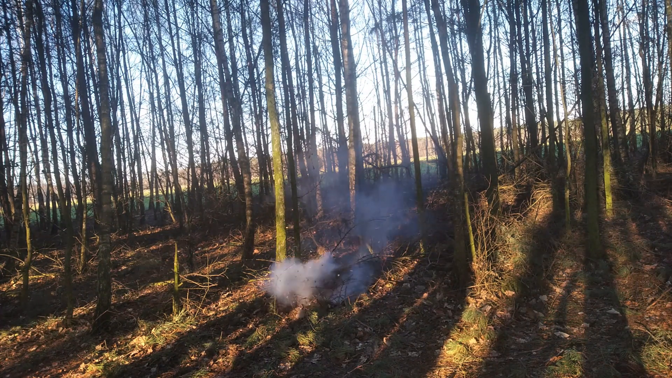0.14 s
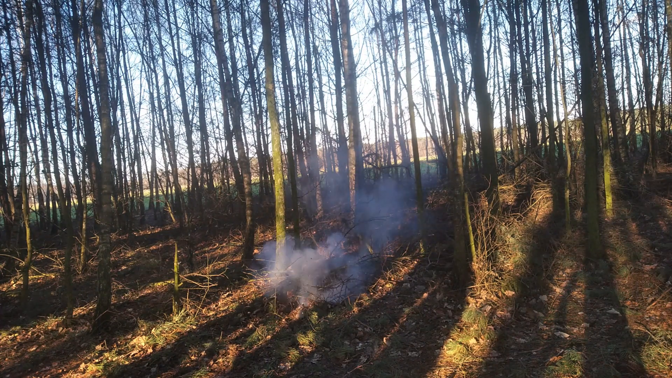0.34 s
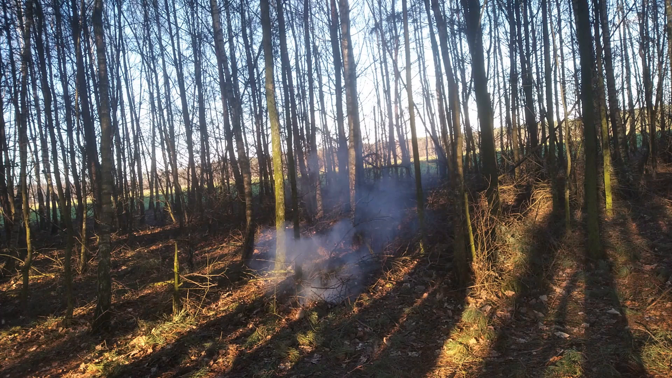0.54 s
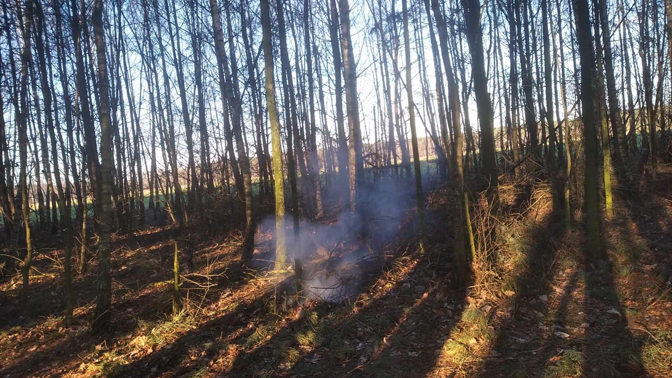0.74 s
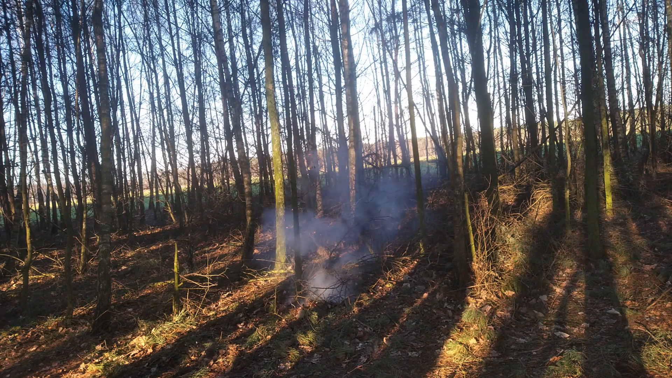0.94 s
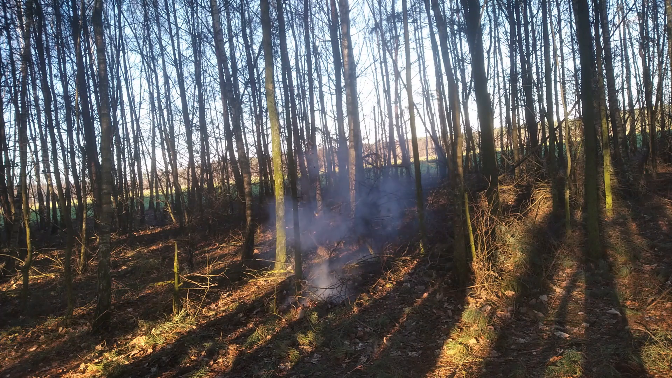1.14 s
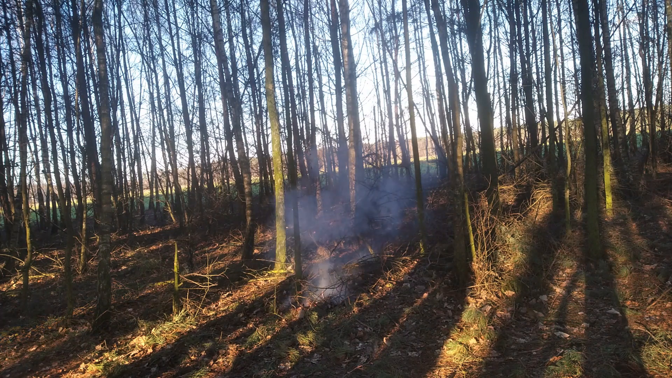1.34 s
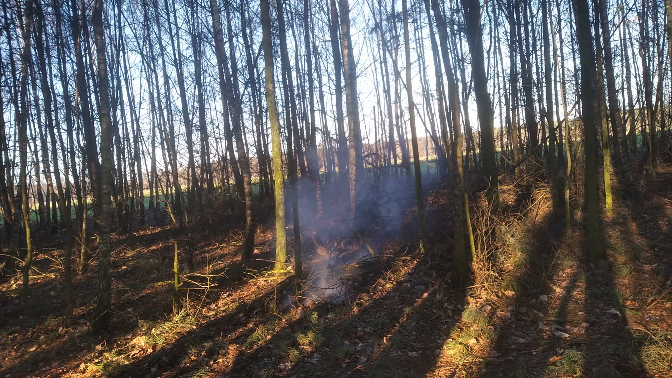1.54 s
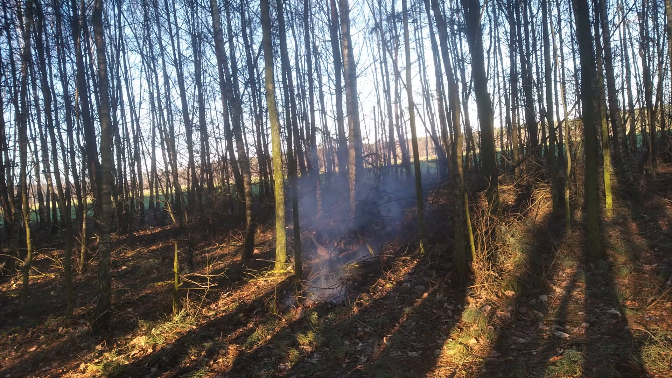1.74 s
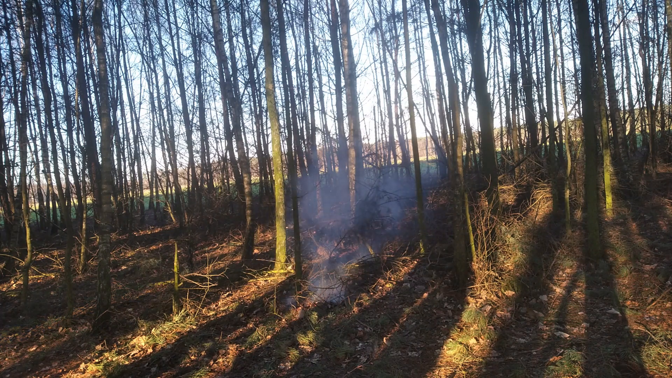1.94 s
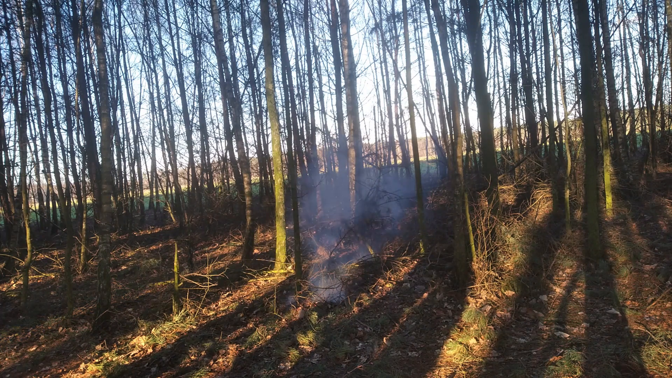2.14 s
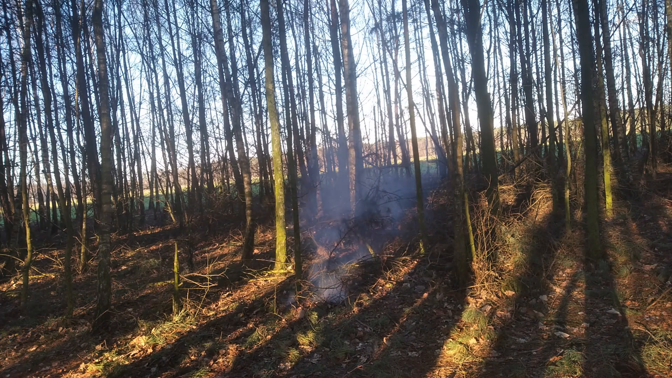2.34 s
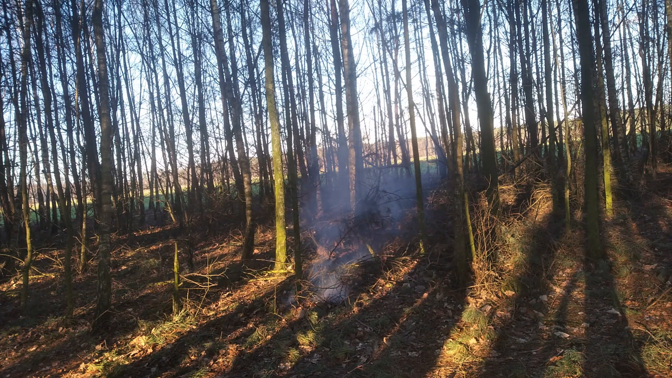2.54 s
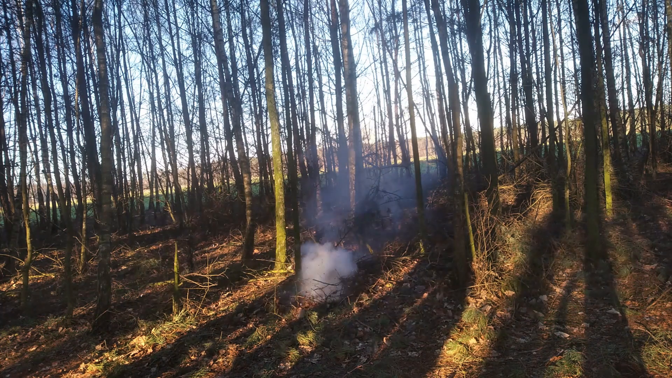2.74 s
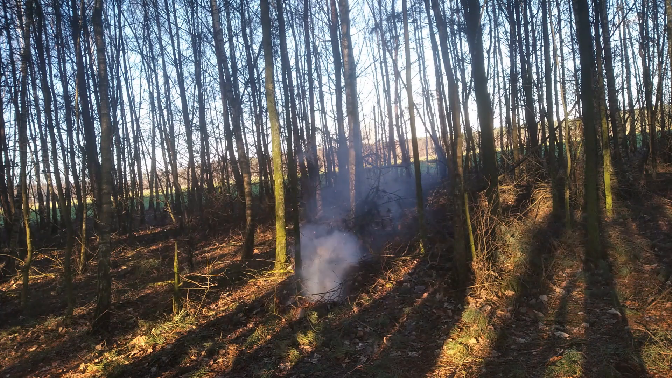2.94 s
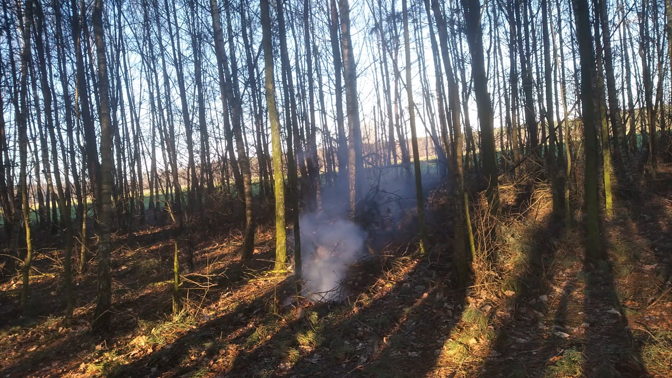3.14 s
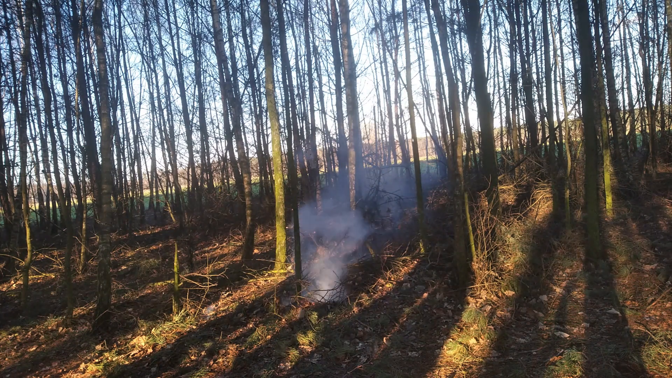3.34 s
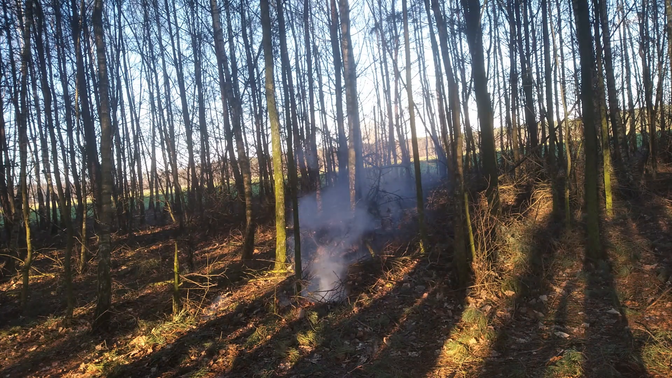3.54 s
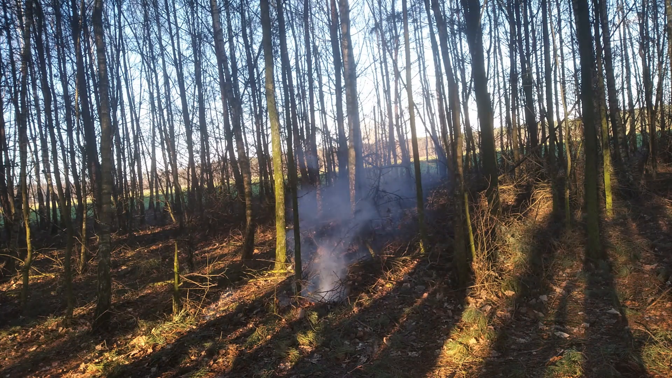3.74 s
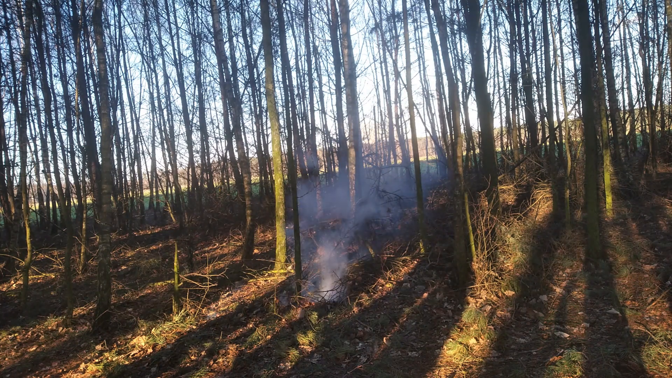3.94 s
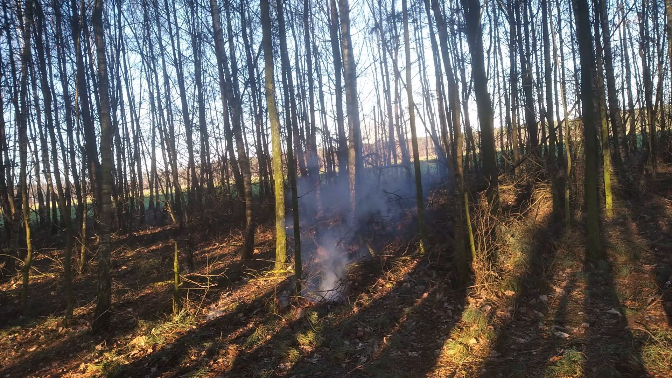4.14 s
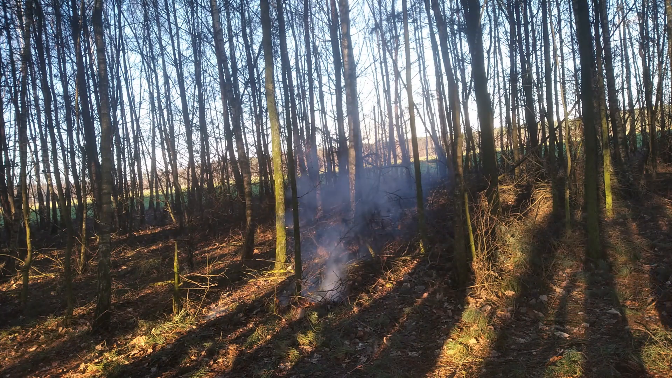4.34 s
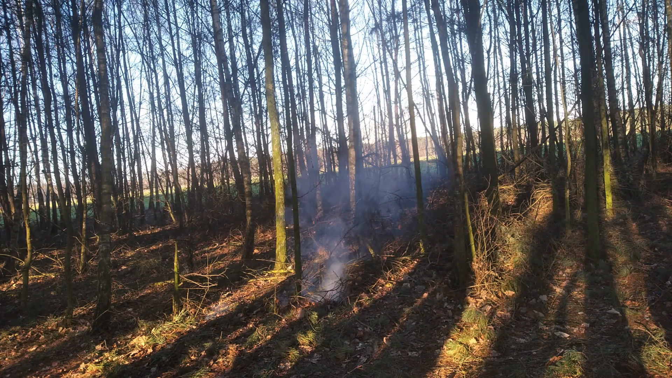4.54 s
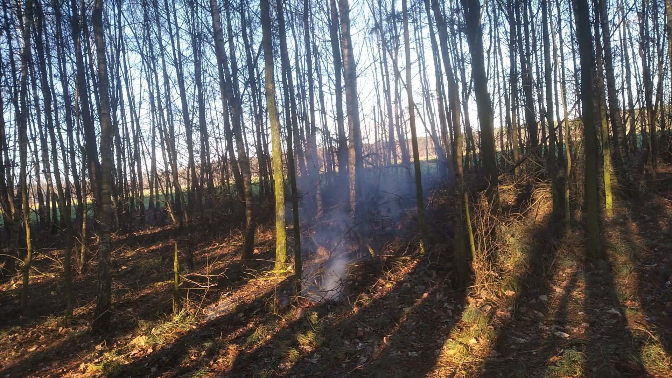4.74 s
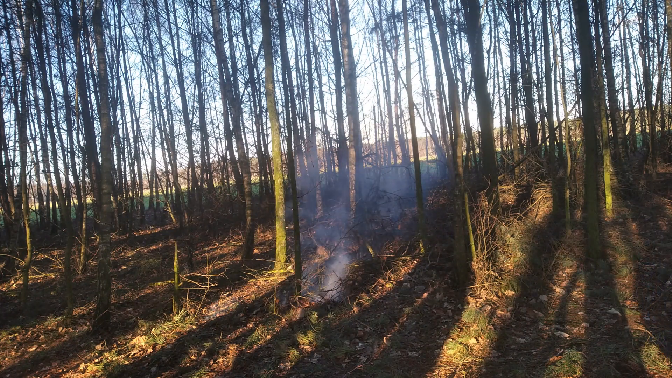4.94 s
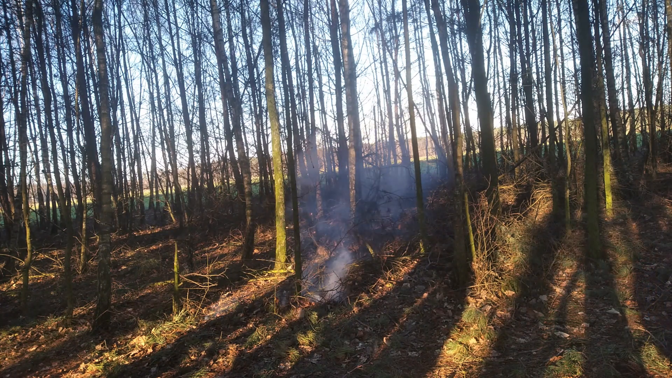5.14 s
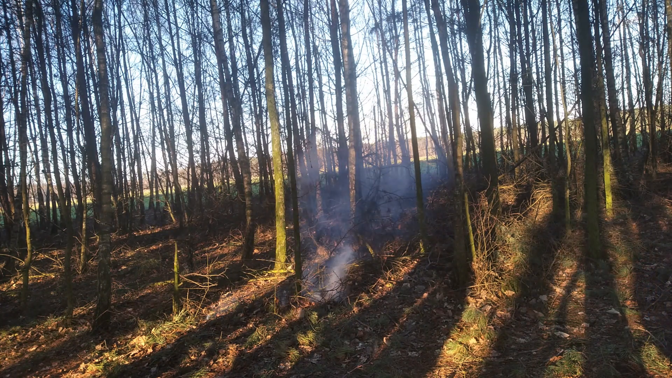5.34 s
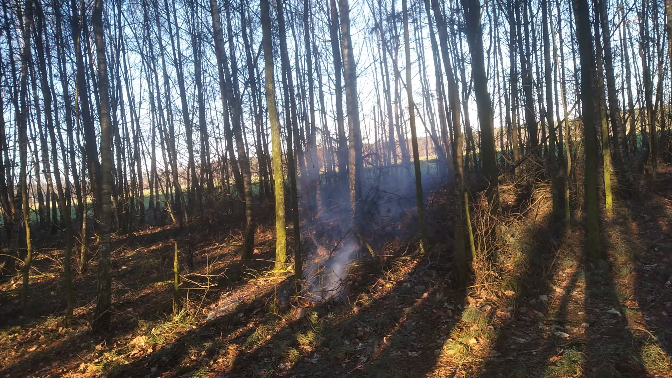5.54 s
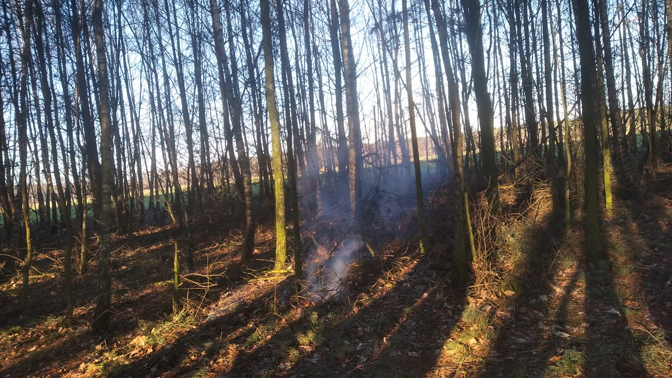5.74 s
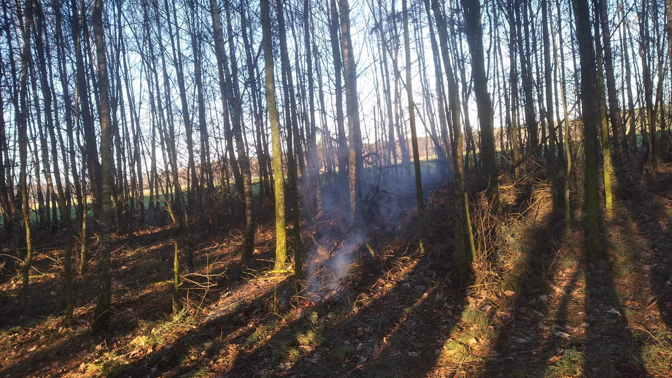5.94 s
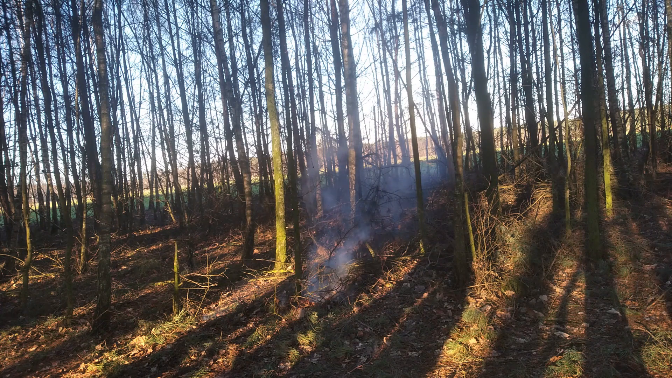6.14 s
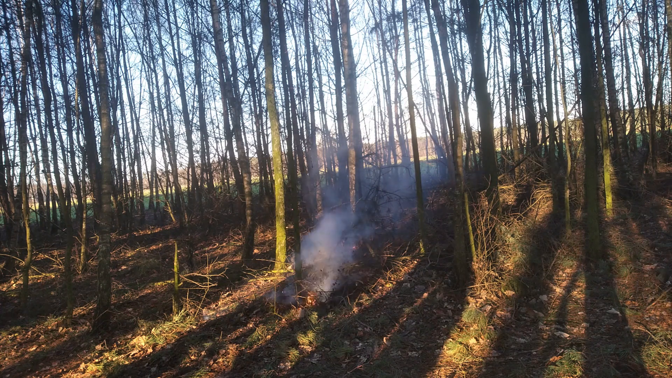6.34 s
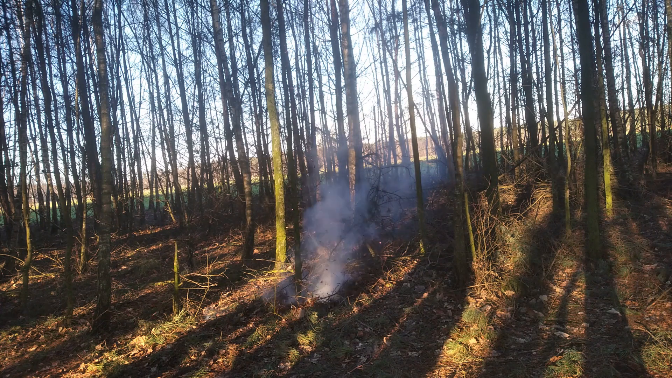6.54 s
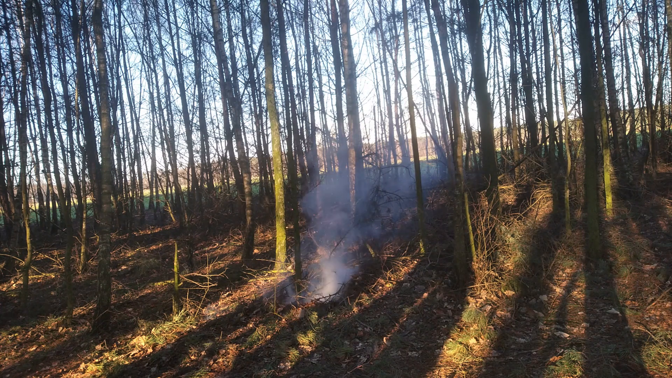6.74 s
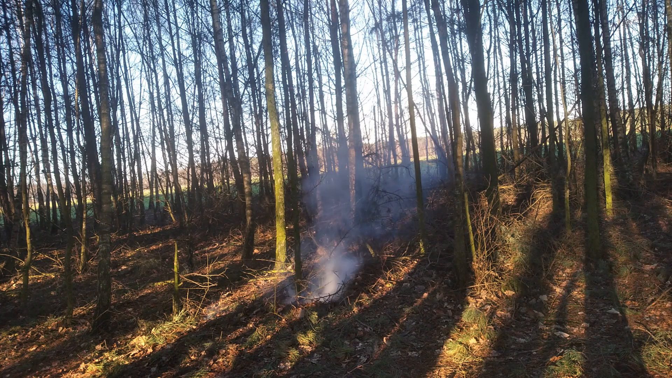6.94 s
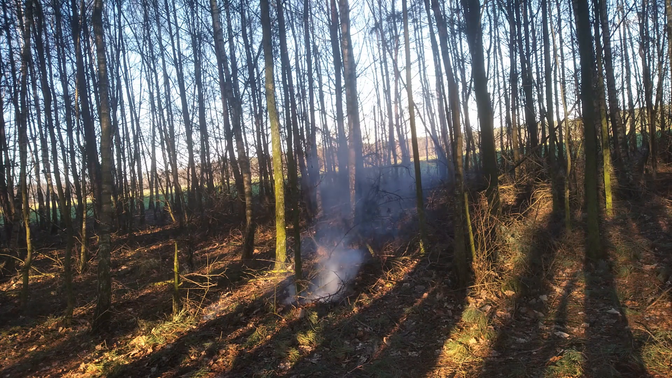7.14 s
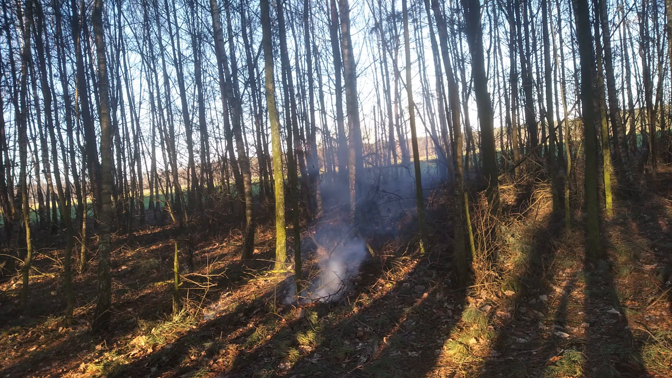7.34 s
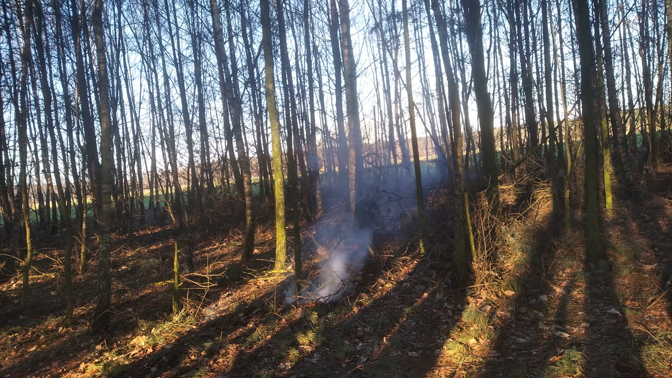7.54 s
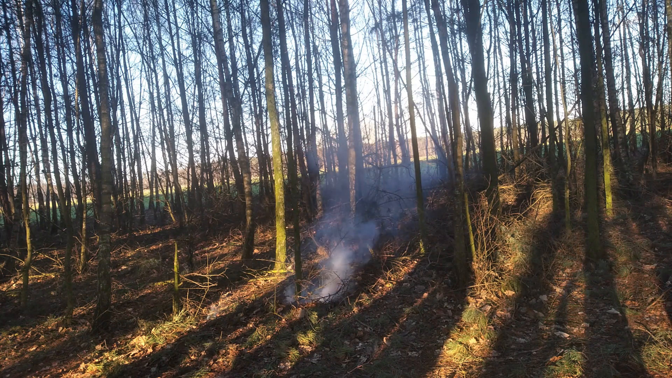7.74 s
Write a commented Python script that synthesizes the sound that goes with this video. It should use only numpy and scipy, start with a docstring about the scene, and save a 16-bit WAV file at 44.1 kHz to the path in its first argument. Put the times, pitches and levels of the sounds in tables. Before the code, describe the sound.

Three loud firecracker bangs go off seconds apart in a bare wood, clipping harshly and echoing off trunks, with fuse hiss flaring between them.

```python
"""In a bare wood, three firecrackers go off one after another, some way from the microphones.
Each blast is a push and pull of air; noise stands in for its echoes from the trunks, which dull as they die.
The blasts overload the microphones: the signal is knocked off centre and clipped flat.
A fuse of flickering noise hisses, and sparks spit as clicks and puffs.
Behind them, steady noise murmurs in the wood and low, lumpy noise is a light wind on the microphone ports."""
import sys
import numpy as np
from scipy import signal
from scipy.fft import rfft, irfft
from scipy.io import wavfile
from scipy.ndimage import uniform_filter1d

SR = 44100
rng = np.random.default_rng(int(sys.argv[2]) if len(sys.argv) > 2 else 0)


def unload_audio(sound):
    """Save the sound as a 16-bit wav file, at the path given as the first command line argument."""
    columns = np.transpose(np.atleast_2d(sound))
    # keep every value between -1 and 1, then stretch to whole-number steps
    steps = np.round(np.clip(columns, -1, 1) * 32767)
    wavfile.write(sys.argv[1], SR, steps.astype(np.int16))


N = 347508  # length in samples


def gain_of(db):
    """Turns dB into a plain multiplier."""
    return 10 ** (np.asarray(db) / 20)


def evened(x):
    """Scales to an average (rms) size of 1."""
    return x / np.sqrt(np.mean(abs(x) ** 2) + 1e-20)


def wander(count, size):
    """Smoothed random values of rms 1; a larger size wanders more slowly."""
    return evened(uniform_filter1d(rng.standard_normal(count), size=size))


def read(points, hz):
    """Reads a (Hz, value) table between its points, on a logarithmic pitch scale."""
    f, value = np.transpose(points)
    return np.interp(np.log(hz + 1), np.log(f + 1), value)


def panned(db, pan_db):
    """Gains of the left and right channels, pan_db apart."""
    return gain_of(db + np.array([[.5], [-.5]]) * pan_db)


def grid(size):
    """Frequencies (column) and times (row) of short spectra that overlap by three quarters."""
    hz = np.fft.rfftfreq(size, 1 / SR)[:, None]
    t = np.arange(4 * N // size + 5) * size / 4 / SR
    return hz, t


def noise(gain, same, patchy_db, lead=0):
    """Two-channel noise shaped by gains over pitch and time, with drifting patches; mean power 1 gives rms 1."""
    bins, frames = gain.shape
    a, b, c, d, patches = rng.standard_normal((frames, bins, 5)).T
    for axis in (0, 1):
        patches = uniform_filter1d(patches, size=10, axis=axis)
    patches = evened(patches)
    same = np.clip(same, -1, 1)
    left = a + 1j * b
    # the right channel shares part of the left, shifted in phase, and adds noise of its own
    right = same * left * np.exp(-1j * lead) + np.sqrt(1 - same ** 2) * (c + 1j * d)
    size = 2 * bins - 2
    unit = np.sqrt(3 / size)
    spectra = np.array([left, right]) * gain * gain_of(patchy_db * patches) * unit
    return signal.istft(spectra, nperseg=size, noverlap=3 * size // 4)[1][:, :N]


# The three firecrackers, also used for their echoes and for the overload.
# Each row: start in seconds, blast level in dB, scatter level in dB, thud level in dB added to the scatter,
# treble tilt in dB per octave, and the base size of the bias swing on the left and on the right in full scales.
BANGS = [(0.0515, 17, -10, 27, 1.4, 0.066, -0.75), (2.6183, 9, -11.5, 25, 1.47, 1.23, -0.36),
         (6.2087, 9, -10.5, 28, 1.48, 0.32, -0.67)]


def blasts():
    """A sharp push and a longer pull of air, straight and once more off the ground."""
    out = np.zeros(N)
    u = np.arange(800) / SR / 0.0012  # time in units of the 1.2 ms push
    push = (1 - u) * np.exp(-u)
    for s, db, *_ in BANGS:
        for late, share in ((0, 0.89), (.0022, 0.62)):  # delay in seconds, strength
            at = round((s + late) * SR)
            out[at:at + len(u)] += share * gain_of(db) * push
    return out


# Colour of the trunk echoes. Each row: frequency in Hz, relative strength in dB.
SCATTER = [(24, -39), (40, -8.5), (139, -17), (183, -5), (260, -11), (342, -2), (637, -4.5), (998, -6.5),
           (2330, -12), (4350, -19), (9410, -28), (13700, -46.5), (15500, -99)]
# How long the trunk echoes last. Each row: frequency in Hz, seconds to fall by 60 dB.
TRUNKS = [(60, 1.5), (130, 0.98), (250, 0.57), (420, 1.2), (800, 1.124), (1500, 1.054), (2900, 0.86),
          (5000, 0.67), (8000, 0.55), (12000, 0.43), (15000, 0.47)]
# Thicker and thinner stands of trees. Each row: seconds after the blast, echo level change in dB.
STAND = [(0, -1.6), (.05, 0), (.15, 0.5), (.24, -1.23), (.4, -0.6), (.6, 2.5), (.9, 6), (1.1, 7)]
# Slow echo of the far wood. Each row: frequency in Hz, dB relative to the scatter.
FAR_EDGE = [(60, -23.5), (300, -22.5), (700, -14), (2000, -17.5), (6000, -39)]
# Ground-hugging thud of the first moments. Each row: frequency in Hz, relative strength in dB.
BOOM = [(30, -11), (90, -12), (160, 1.1), (250, 2.5), (400, -2), (650, -11.5), (1200, -39)]
# How alike the echoes are on both sides. Each row: frequency in Hz, likeness (1 is identical).
DIFFUSE = [(60, 0.67), (130, 0.94), (290, 0.93), (600, 0.51), (1100, 0.49), (2500, 0.06), (6000, .03)]


def wood():
    """Countless trunk echoes merge into noise; air eats the treble on the longer paths."""
    far_t60, boom_t60 = 2.595, .16  # seconds to fall by 60 dB
    echo_lag = 0.00036  # seconds
    hz, t = grid(size=512)
    age = t[t < 3]
    out = np.zeros((2, N))
    lead = -2 * np.pi * hz * echo_lag  # most echoes reach the right port first
    for s, _, db, thud_db, tilt_db, *_ in BANGS:
        # the decay of near and far echoes is counted from a quarter second in
        near = gain_of(np.interp(age, *np.transpose(STAND)) - 60 * (age - .25) / read(TRUNKS, hz))
        far = gain_of(read(FAR_EDGE, hz) - 60 * (age - .25) / far_t60)
        boom = gain_of(thud_db + read(BOOM, hz) - 60 * age / boom_t60)
        surge_db = 0.76 * wander(len(age), size=3)  # single big trunks stand out
        level_db = db + surge_db + tilt_db * np.log2((hz + 1) / 1000)
        colour = evened(gain_of(read(SCATTER, hz))) * gain_of(level_db)
        decay = np.sqrt(near ** 2 + far ** 2 + boom ** 2)
        echoes = noise(colour * decay, read(DIFFUSE, hz), patchy_db=1.0, lead=lead)
        # the first echoes follow the blast
        heard = np.clip((np.arange(echoes.shape[1]) / SR - .0002) / 0.0018, 0, 1)
        part = out[:, round(s * SR):][:, :len(heard)]
        part += (heard * echoes)[:, :part.shape[1]]
    return out


# Colour of the fuse hiss. Each row: frequency in Hz, relative strength in dB.
FIZZ = [(410, -35), (700, -12), (1610, -7.5), (2560, -3), (2760, -5.5), (2980, -2.5), (3610, -2.5),
        (5660, -3), (9450, -2.5), (14100, -10.5), (15000, -27.5)]
# How alike the hiss is on both sides. Each row: frequency in Hz, likeness (negative is opposed).
FIZZ_SAME = [(60, 0.3), (180, 0.59), (550, 0.07), (1650, 0.4), (4970, -0.77), (15000, -0.09)]
# How far the left side leads in the hiss. Each row: frequency in Hz, phase in radians.
FIZZ_LEAD = [(0, 1.5), (1980, -15), (3700, -21.5), (5770, -4.5), (13600, -12), (15300, -9.5)]
# A fresh fuse catches and flares. Each row: peak in seconds, rise in seconds, fall in seconds,
# hiss level in dB, extra level of the lower band in dB.
FLARES = [(0.77, 0.065, .12, -41.5, -19), (4.07, 0.16, 0.13, -37, -12.5), (7.375, 0.071, 0.15, -36, -2)]
# Steady burning between flares. Each row: time in seconds, hiss level in dB, extra level of the lower band in dB.
BURN = [(0.0, -73, -7), (0.65, -60, 0.1), (0.95, -44.5, 5), (1.25, -49, 0), (1.55, -47.5, -1.5),
        (2.3, -51, -1.2), (2.58, -48.5, -10.5), (3.35, -52, 0.1), (3.64, -67, -6), (4.25, -53, 9),
        (4.45, -50.5, 4.5), (5.1, -55, 5), (5.44, -50, 2.5), (5.75, -55, 4.5), (6.1, -71, -6.5),
        (6.85, -52, 2), (7.18, -58, -11), (7.6, -52, 4.5), (7.88, -55, 9)]


def fuse():
    """Powder fizz that flares as it catches and then burns on, flickering over all bands at once."""
    hz, t = grid(size=256)
    lowness = 1 / (1 + (hz / 4500) ** 4)  # 1 in the lower band, falling to 0 above
    s, db, low_db = np.transpose(BURN)
    power = gain_of(np.interp(t, s, db) + np.interp(t, s, low_db) * lowness) ** 2
    for peak, rise, fall, db, low_db in FLARES:
        shape = np.exp(-(abs(t - peak) / np.where(t < peak, rise, fall)) ** 1.46)
        power = power + (shape * gain_of(db + low_db * lowness)) ** 2
    flicker_db = 1.5 * wander(len(t), size=3)
    sputter_db = 1.5 * wander(len(t), size=25)  # the flame dips and recovers
    gain = evened(gain_of(read(FIZZ, hz))) * np.sqrt(power) * gain_of(flicker_db + sputter_db)
    hiss = noise(gain, read(FIZZ_SAME, hz), patchy_db=-0.4, lead=read(FIZZ_LEAD, hz))
    grains = gain_of(1.5 * wander(N, size=40))  # powder burns grain by grain
    return evened(grains) * hiss


# The sparks. Each row: start in seconds, level in dB, pitch in Hz, cycles until the ring has mostly faded,
# left minus right in dB, share of puff beside the click, puff fading time in seconds.
SPITS = [(4.4402, -32, 8550, 13, -4, .1, .002), (4.818, -36, 6000, 1.2, -1, .5, .002),
         (5.0707, -20.5, 5500, .7, -2, 0.68, 0.0012), (5.862, -33, 3500, 0.81, -0.5, 0.48, .001),
         (6.154, -35.5, 6770, 1.2, -4, 0.82, 0.0074), (6.953, -31, 9060, 1.2, -3, .6, 0.0023),
         (7.4, -33, 3190, 1.2, -4, .6, .002)]


def spits():
    """Sparks: a click or brief ring inside a short puff of noise."""
    out = np.zeros((2, N))
    t = np.arange(800) / SR
    soft = signal.butter(4, [1200, 12000], "bandpass", fs=SR, output="sos")
    for s, db, hz, cycles, pan_db, share, length in SPITS:
        click = np.sin(2 * np.pi * hz * t) * np.exp(-t * hz / cycles)
        puff = signal.sosfilt(soft, rng.standard_normal((2, 800))) * np.exp(-t / length)
        at = round(s * SR)
        out[:, at:at + len(t)] += panned(db, pan_db) * (click + share * puff)
    return out


# Colour of the rumble. Each row: frequency in Hz, relative strength in dB.
BUFFET = [(8.8, -27), (15, 10.5), (60, -4.5), (136, -12.5), (166, -25.5), (225, -38.5), (300, -33.5),
          (390, -57.5), (660, -120)]
# The stronger gusts. Each row: middle in seconds, half length in seconds, level in dB, left minus right in dB.
GUSTS = [(0.032, .03, -41, -8), (0.64, 0.074, -40, 7), (0.818, 0.099, -48, 9), (1.347, .13, -45.5, 14),
         (1.638, 0.038, -51, 7), (2.478, .07, -51.5, -1.8), (3.298, 0.11, -47.5, 11),
         (4.657, 0.047, -52, -17.5), (4.793, 0.078, -45, 10), (4.994, .07, -36.5, 10.5),
         (5.112, .03, -48, 8), (5.203, .04, -46, -3), (5.312, .04, -50, -4), (5.837, 0.11, -48, 3),
         (7.017, .08, -45, -5.5), (7.267, .08, -50, 8), (7.65, 0.056, -46.5, 17), (7.763, .03, -44, 8),
         (7.83, 0.031, -43, 15)]


def wind():
    """Lumpy low buffeting with a few stronger gusts, mostly unrelated at the two ports."""
    breeze_db, lump_db, lull_db = -57, 2.5, -60  # level between gusts, depth of its lumps, steady rumble
    hz, t = grid(size=2048)
    colour = evened(gain_of(read(BUFFET, hz))) * (hz < 400)
    rumble = noise(colour + 0 * t, 0.22, patchy_db=2.0)
    t = np.arange(N) / SR
    span = round(.04 * SR)  # lumps of about 40 ms
    lumps = rng.standard_normal((2, N))
    for _ in range(2):
        lumps = uniform_filter1d(lumps, span)
    power = gain_of(breeze_db + lump_db * evened(lumps)) ** 2 + gain_of(lull_db) ** 2
    for s, half, db, pan_db in GUSTS:
        swell = np.clip(1 - abs(t - s) / half, 0, 1)
        power += (panned(db, pan_db) * swell) ** 2
    return rumble * np.sqrt(power)


# Colour of the murmur. Each row: frequency in Hz, relative strength in dB.
AIR = [(88, -40), (150, -6), (416, 1.5), (1130, -6.5), (2600, -2.5), (3340, -4), (5840, -3), (9450, 3),
       (13900, -9.5), (15000, -20)]
# How alike the murmur is on both sides. Each row: frequency in Hz, likeness (1 is identical).
AIR_SAME = [(60, 0.08), (180, 0.35), (550, 0.73), (1650, 1), (4970, 0.95), (15000, 0.07)]


def air():
    """The steady murmur of the wood, as gently patchy noise."""
    hz, t = grid(size=1024)
    gain = gain_of(-50) * evened(gain_of(read(AIR, hz)))
    lead = -2 * np.pi * hz * .00005  # the right side is 0.05 ms early
    return noise(gain + 0 * t, read(AIR_SAME, hz), patchy_db=2.0, lead=lead)


def scene():
    """Everything that reaches the two ports."""
    return blasts() + wood() + fuse() + spits() + wind() + air()


# How each side's bias swings back, left row then right row. Each row: pace in seconds,
# growth of each half swing (a ratio), decay in seconds, share of the rebound that is kept.
BIAS = [(.065, 2.3, .2, .75), (.097, 2.0, .33, .5)]


def bias():
    """Each blast knocks the input stage off centre; it swings back ever more slowly."""
    out = np.zeros((2, N))
    t = np.arange(N) / SR
    for s, *_, left, right in BANGS:
        age = np.maximum(t - s, 0)
        knock = 1 - np.exp(-age / .003)
        for side, size in enumerate((left, right)):
            pace, slowing, decay, rebound = BIAS[side]
            # half swings so far, counted on a logarithm so that each lasts longer
            swings = np.maximum(np.log1p(age / pace) / np.log(slowing), .4)
            swing = np.sin(np.pi * swings)
            swing = np.maximum(swing, rebound * swing)  # weakens only the rebound
            out[side] += size * knock * swing * np.exp(-(age / decay) ** 1.5)
    return out


# Unequal microphone ports. Each row: frequency in Hz, left minus right in dB.
PORTS = [(300, 0), (1290, 1.0), (2380, 0), (4400, 2), (8120, -7.5), (15000, -3)]


def record(dry):
    """Unequal ports, a bias that grows with the overload, a hard clip, the band limit."""
    hz = np.fft.rfftfreq(N, 1 / SR)
    ported = irfft(rfft(dry) * panned(0, read(PORTS, hz)), N)
    loudness = np.sqrt(abs(uniform_filter1d(ported ** 2, size=1500, axis=1)))
    clipped = np.clip(ported + bias() * (1 + 1.2 * loudness), -1, 1)
    band_limit = signal.firwin(511, 15750, window=("kaiser", 9), fs=SR)  # lowpass edge in Hz
    return signal.oaconvolve(clipped, band_limit[None], "same")


dry = scene()
out = record(dry)
unload_audio(out)
```